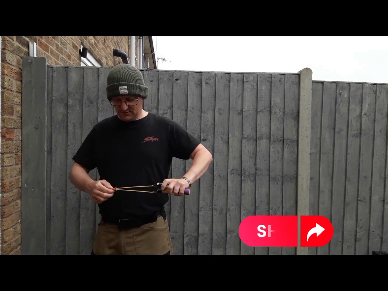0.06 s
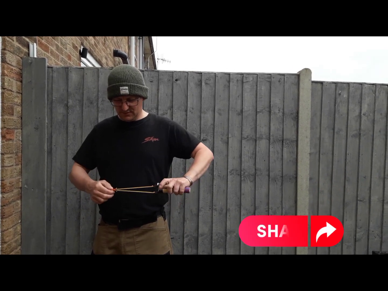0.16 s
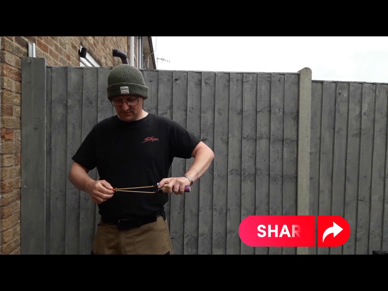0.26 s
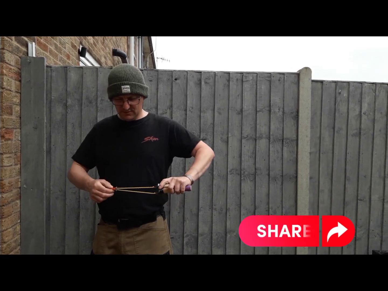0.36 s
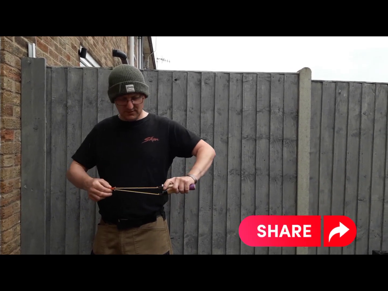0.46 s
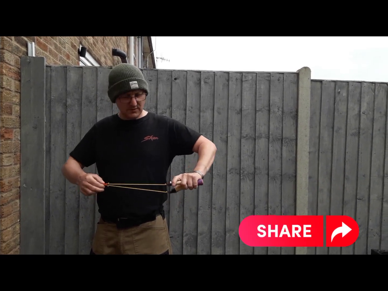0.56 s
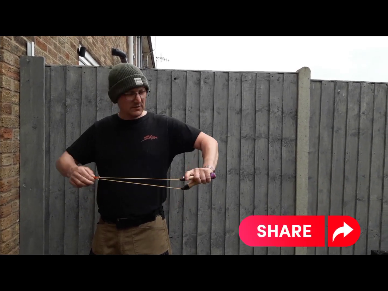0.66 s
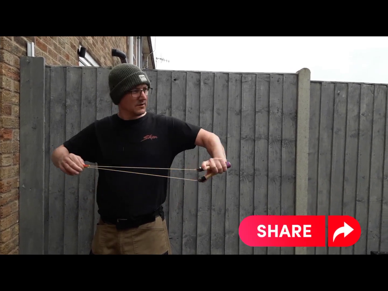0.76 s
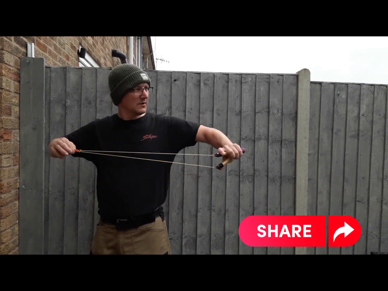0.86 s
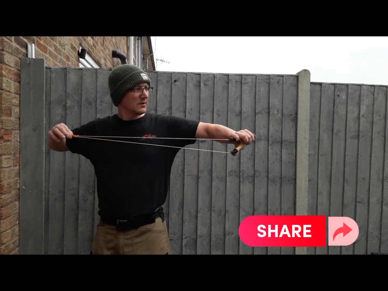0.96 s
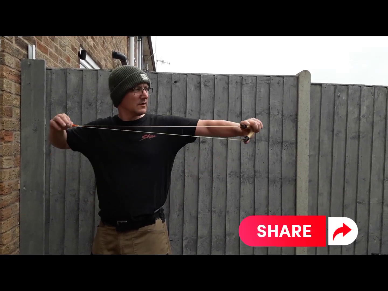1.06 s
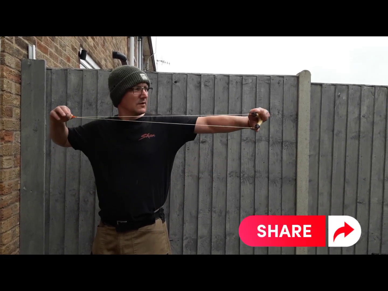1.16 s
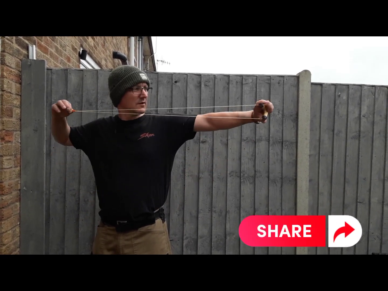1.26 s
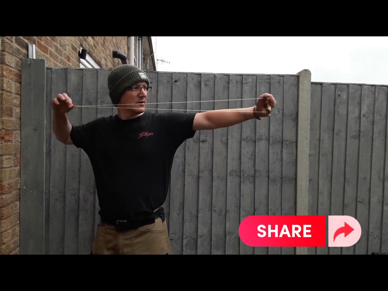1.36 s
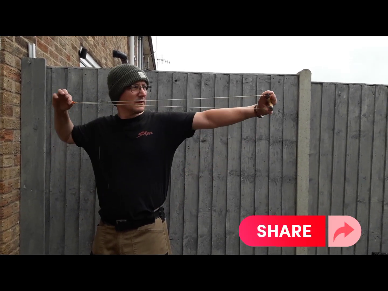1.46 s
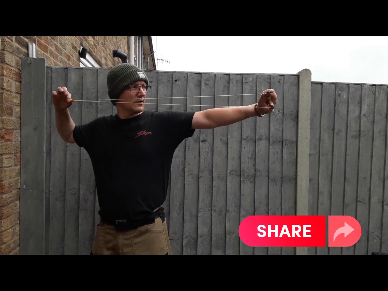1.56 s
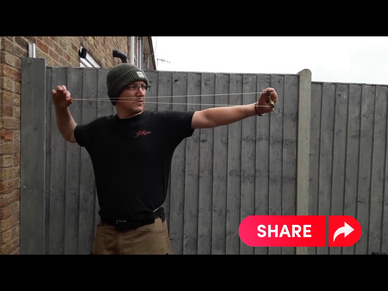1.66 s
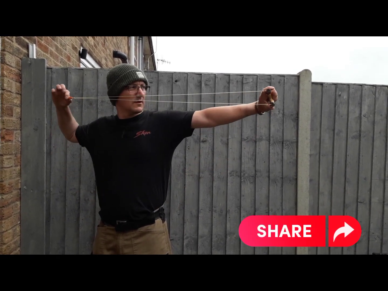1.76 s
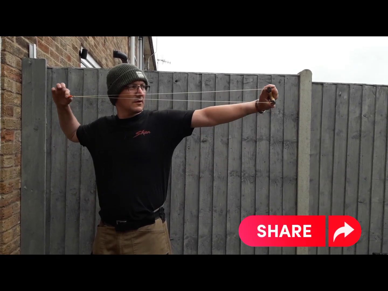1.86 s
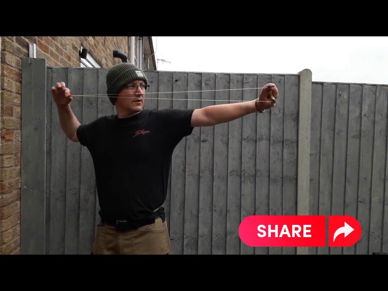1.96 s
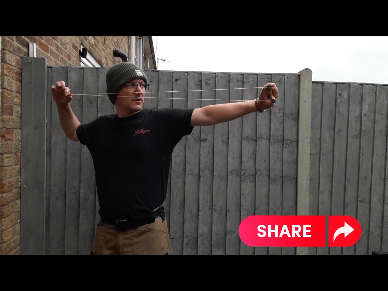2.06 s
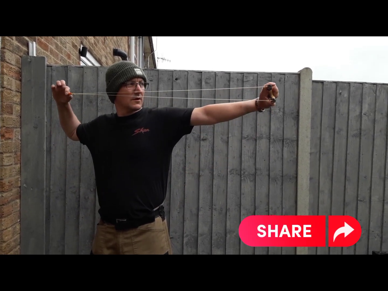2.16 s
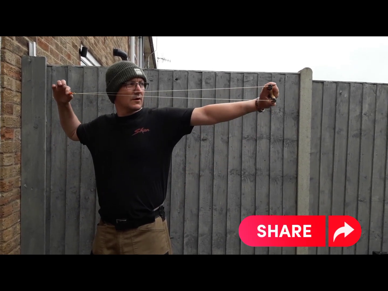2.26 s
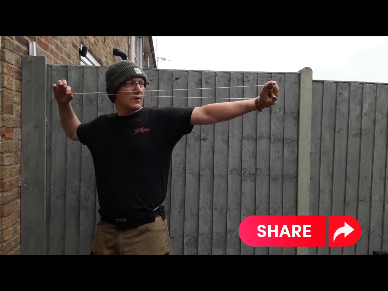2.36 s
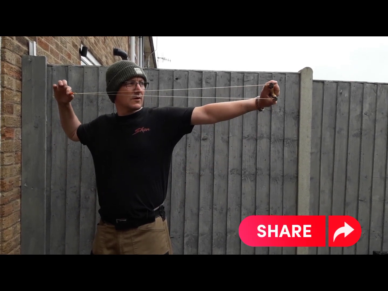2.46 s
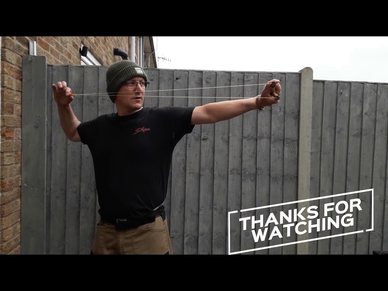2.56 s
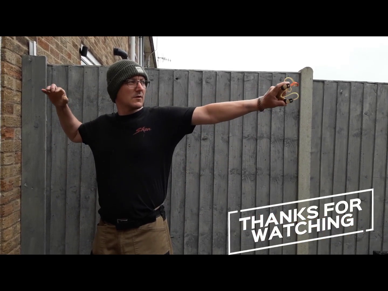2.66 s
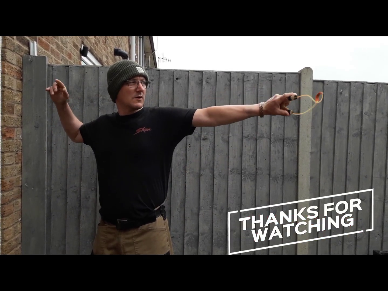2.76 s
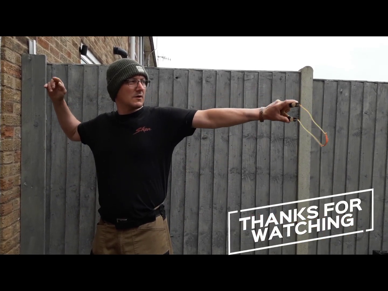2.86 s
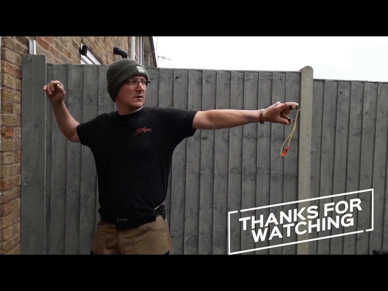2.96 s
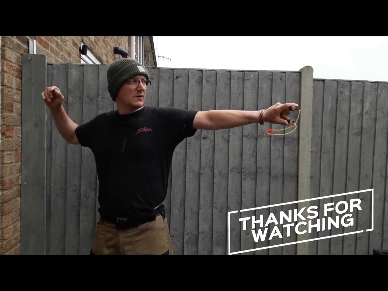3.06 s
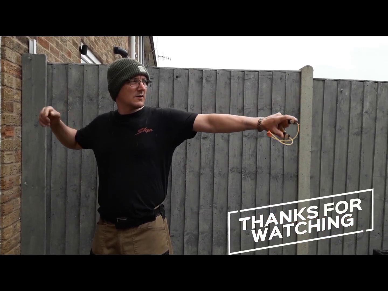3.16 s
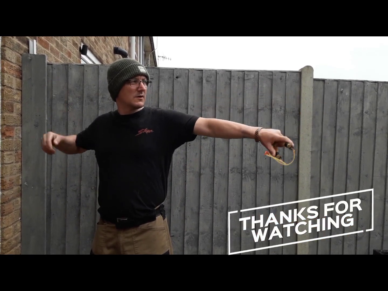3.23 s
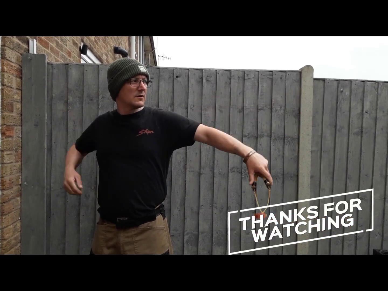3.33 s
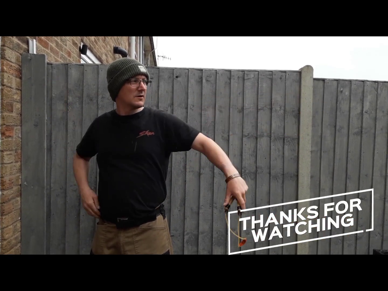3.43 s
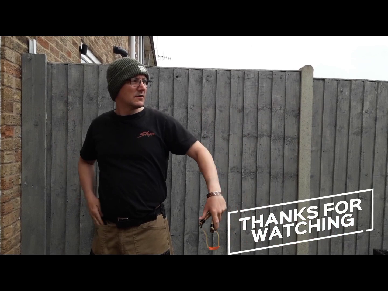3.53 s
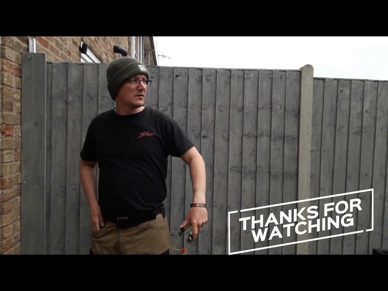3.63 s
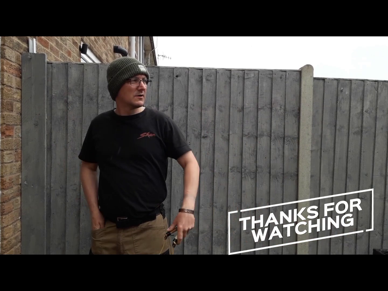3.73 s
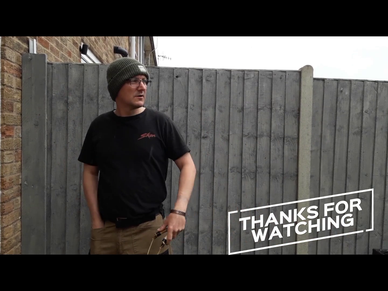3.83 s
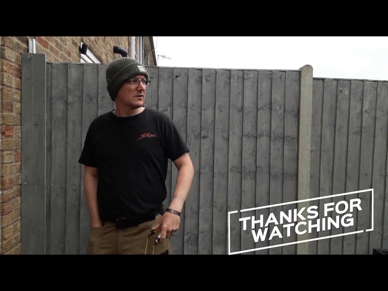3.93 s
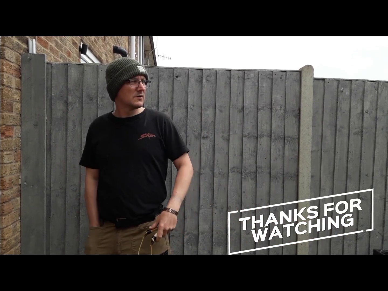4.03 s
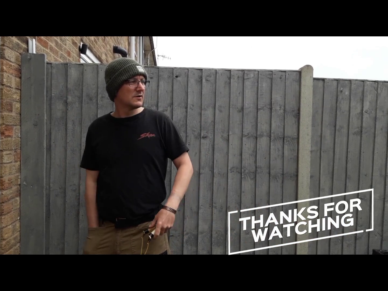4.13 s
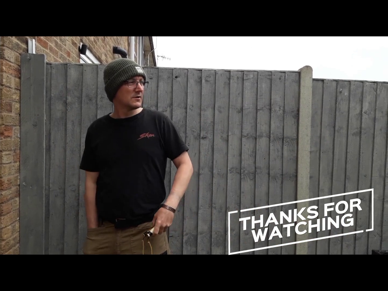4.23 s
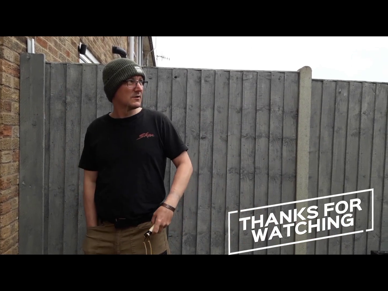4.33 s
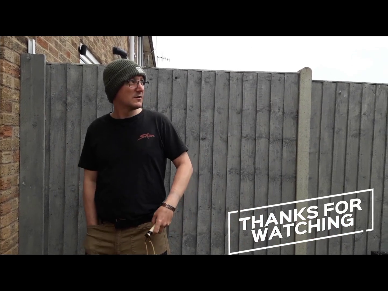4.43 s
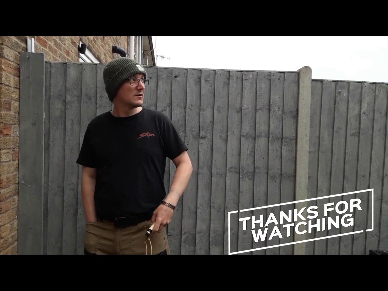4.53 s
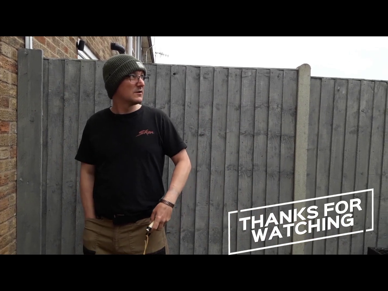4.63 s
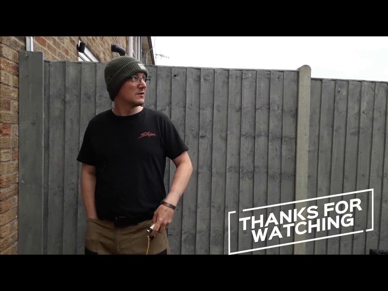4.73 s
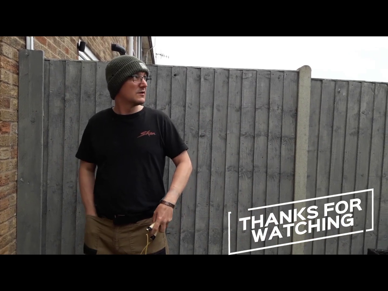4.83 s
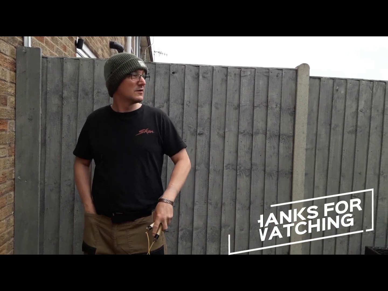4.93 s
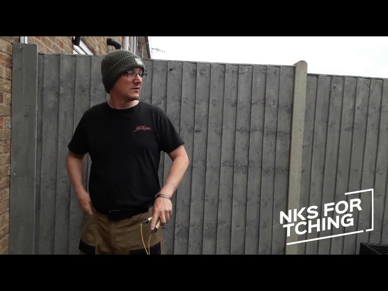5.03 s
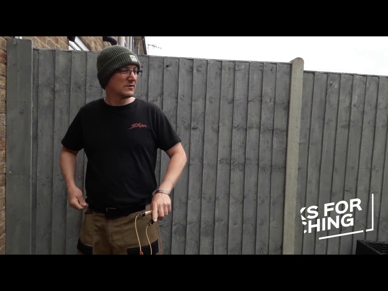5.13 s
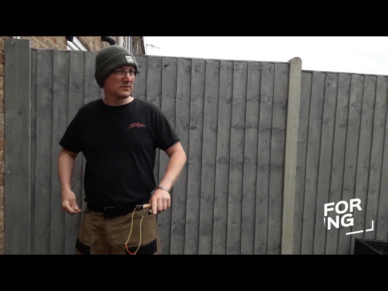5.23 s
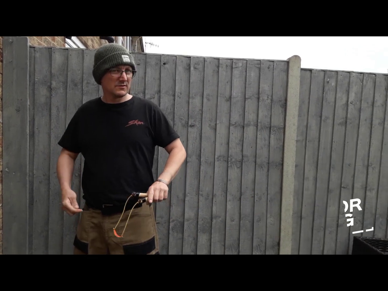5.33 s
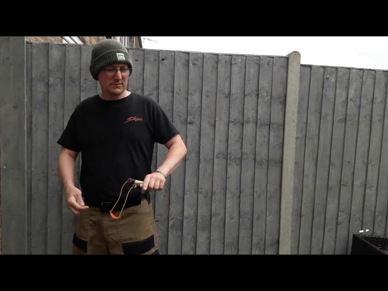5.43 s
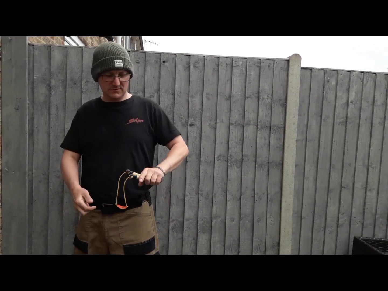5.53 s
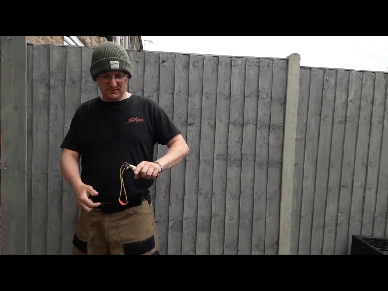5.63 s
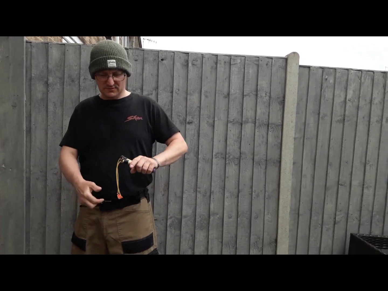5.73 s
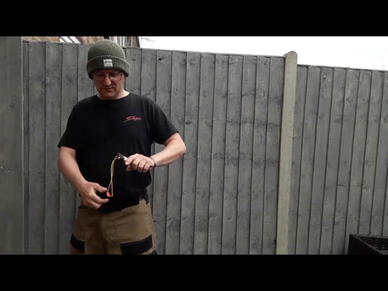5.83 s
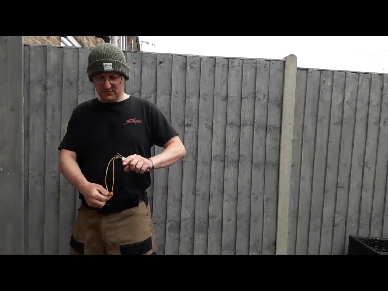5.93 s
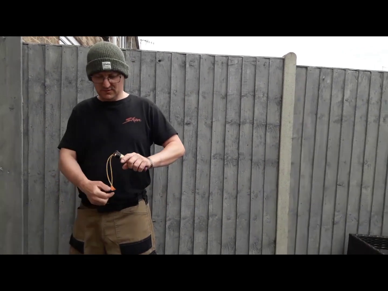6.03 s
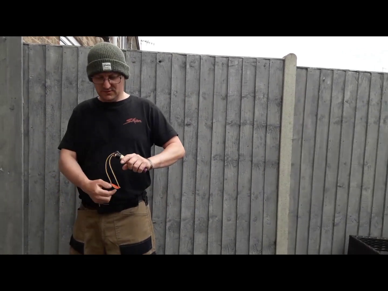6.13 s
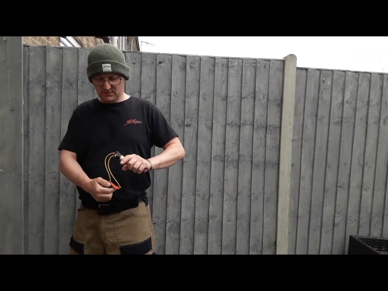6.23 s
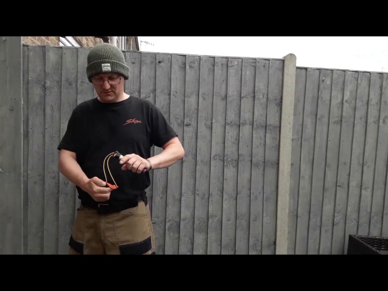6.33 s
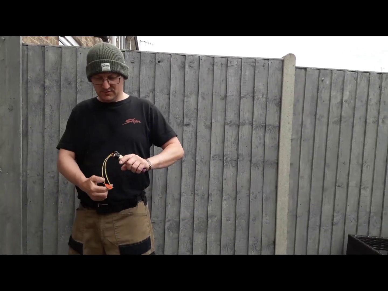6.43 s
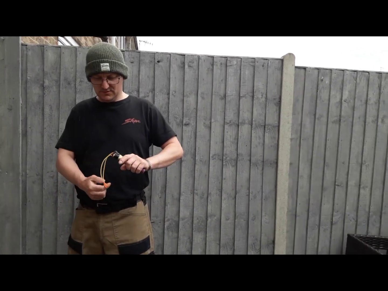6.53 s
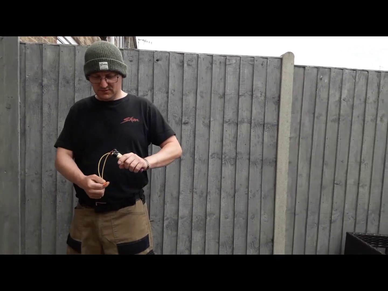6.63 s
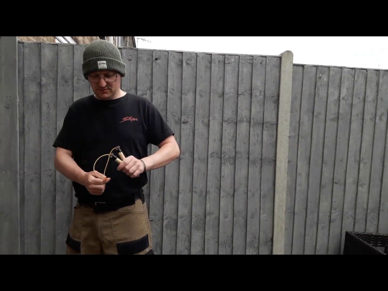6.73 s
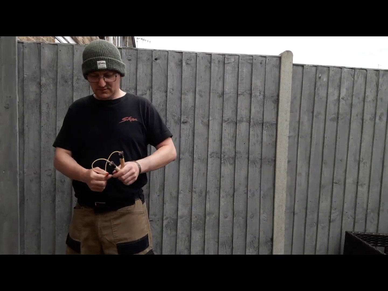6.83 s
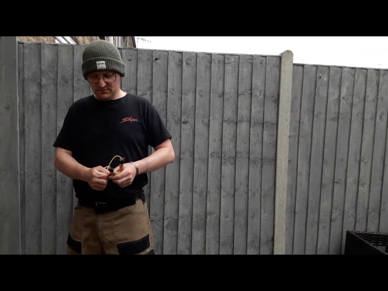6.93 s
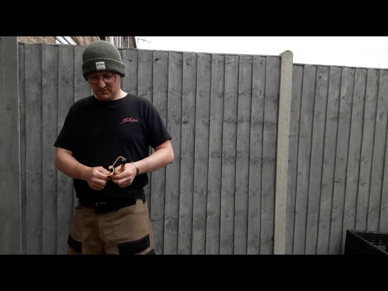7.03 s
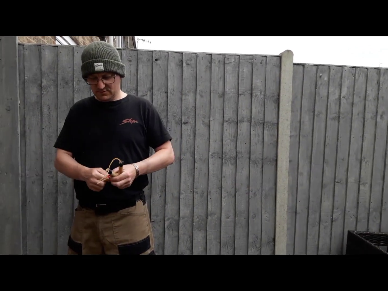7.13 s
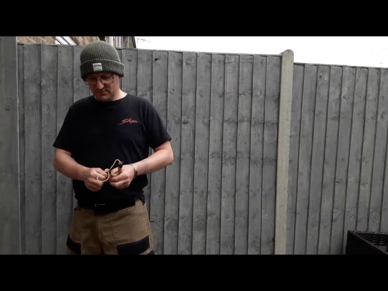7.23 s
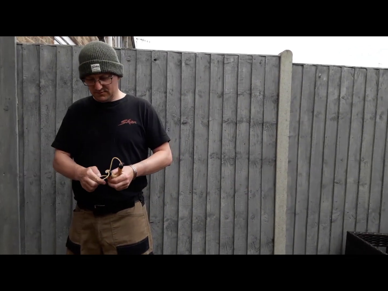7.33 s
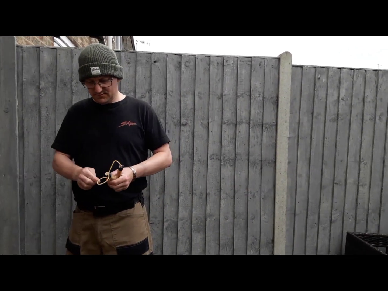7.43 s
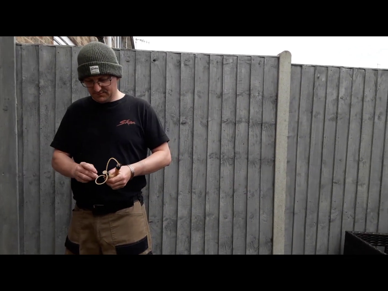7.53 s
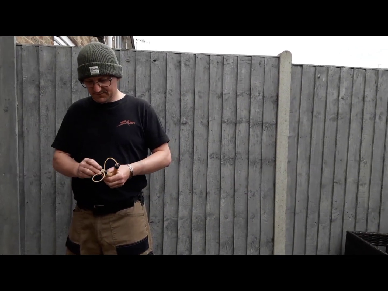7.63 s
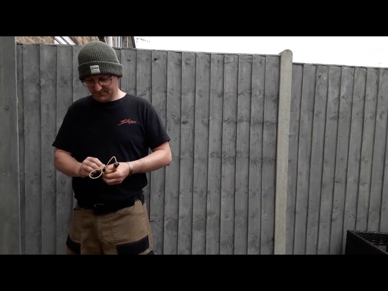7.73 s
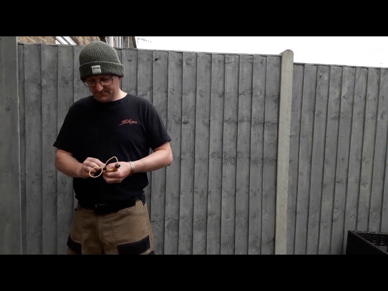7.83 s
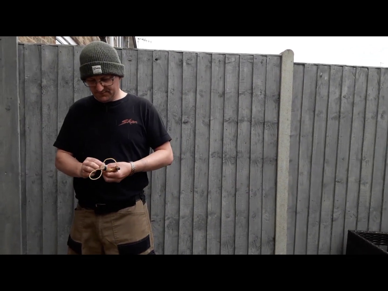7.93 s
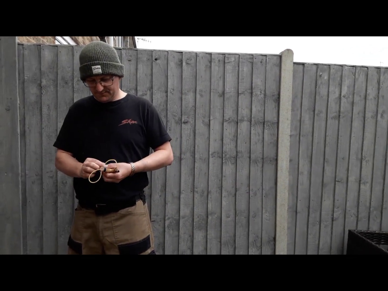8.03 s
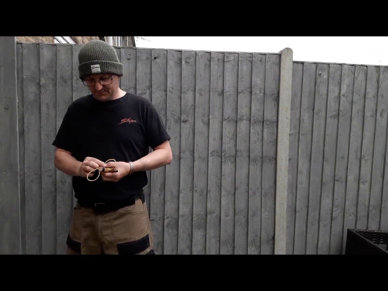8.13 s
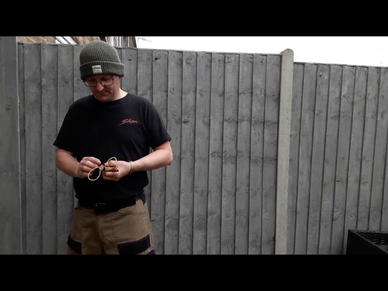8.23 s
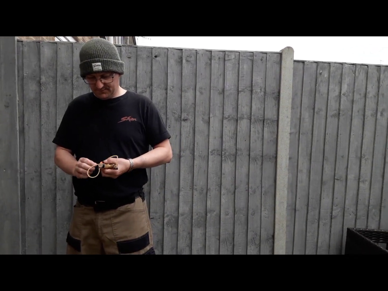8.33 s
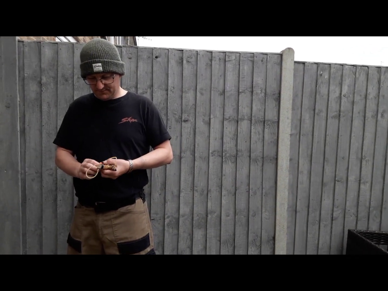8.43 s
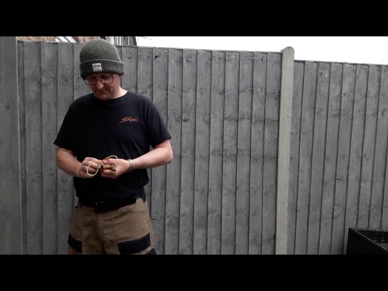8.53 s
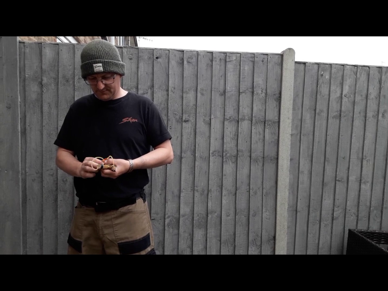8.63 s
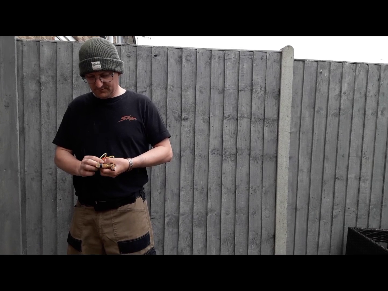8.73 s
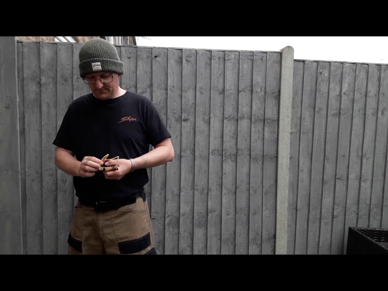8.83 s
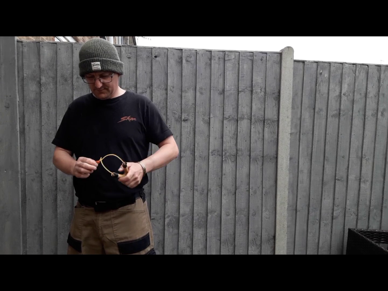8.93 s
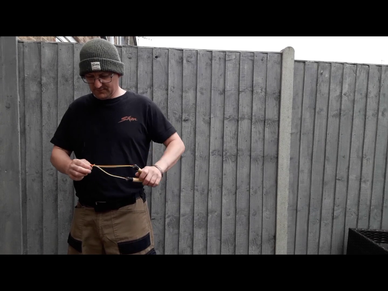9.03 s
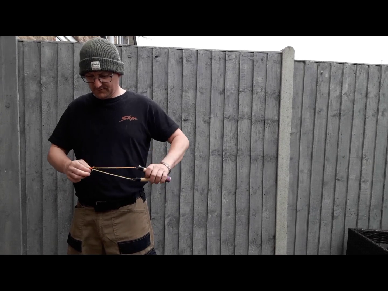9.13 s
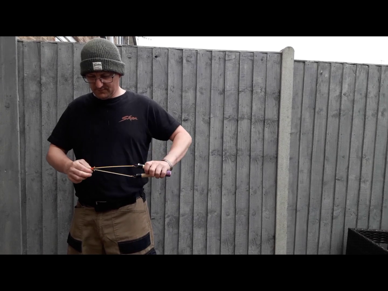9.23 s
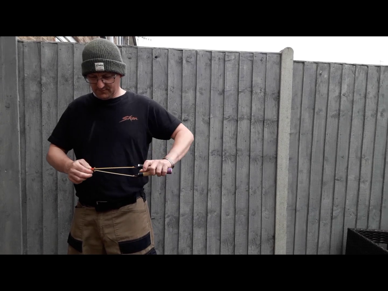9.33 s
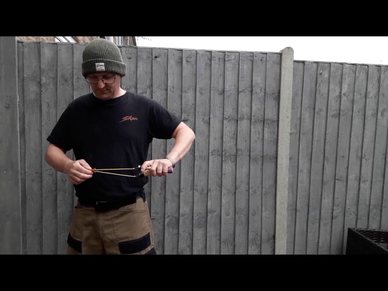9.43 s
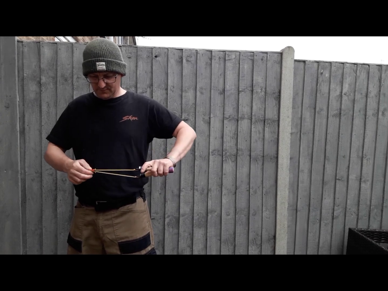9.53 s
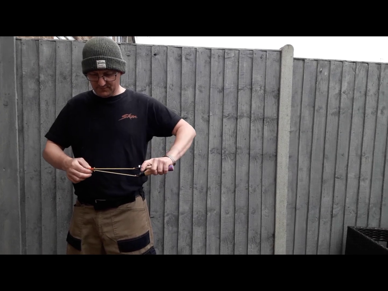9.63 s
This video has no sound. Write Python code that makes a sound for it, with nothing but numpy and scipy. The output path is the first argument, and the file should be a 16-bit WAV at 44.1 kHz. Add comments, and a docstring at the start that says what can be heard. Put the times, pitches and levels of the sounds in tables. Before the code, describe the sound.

Small creaks of stretched rubber lead to the sharp, close crack of a slingshot and the bright ring of a tin can that tumbles away. A soft cloth rustle and handling ticks follow, then a thin hinge squeak, latch clinks and a more distant wooden gate groan. The garden has a short echo, faint hiss, far town rumble and a few birds. Brief gusts thump the microphone last.

```python
"""A walled garden, one microphone: a faint hiss, the rumble of a far town and a few distant birds.
Close by, a slingshot's rubber creaks as it is drawn, then whips and slaps; the ball strikes a tin can,
which rings, tumbles and bounces. Cloth rustles close up, like a hand in a pocket. Later a dry hinge
squeaks, a latch clinks and, farther off, a wooden gate groans as it sticks and slips.
The walls give a short echo. At the end wind buffets the microphone."""
import sys
import numpy as np
from scipy import signal
from scipy.io import wavfile
from scipy.ndimage import uniform_filter1d, minimum_filter1d

SR = 44100
rng = np.random.default_rng(int(sys.argv[2]) if len(sys.argv) > 2 else 0)


def to_wav(sig):
    """Store sig (one row per channel, or 1-D mono) as 16-bit WAV at the path in sys.argv[1].

    Samples outside -1..1 are clipped; the rate is SR.
    """
    pcm = np.clip(np.atleast_2d(sig), -1, 1) * 32767
    pcm = np.round(pcm).astype(np.int16)
    wavfile.write(sys.argv[1], SR, pcm.T)  # frames by channels


N = 426888

# spectrum of the bands' slap and the can's rattle: (frequency [Hz], relative density [dB])
SLAP_SPECTRUM = [(35, -48.5), (60, -20.5), (389, -20.5), (621, -33), (924, -23), (1700, -24), (3270, -17.5),
                 (3940, -20), (6900, -4), (8320, -19), (16000, -48)]
# spectrum of the rustle at its loudest and of the latch's grit: (frequency [Hz], relative density [dB])
RUSTLE_SPECTRUM = [(500, -45.5), (900, -27), (3400, -22.5), (3900, -13), (5300, -5.5), (6000, -4.5),
                   (6750, 2.5), (7500, -8.5), (8100, -18.5), (10000, -38.5), (16000, -60.5)]


def amp(db):
    """Decibels as a gain."""
    return 10 ** (np.asarray(db) / 20)


def unit_rms(x):
    """Scales to rms 1."""
    return x / np.sqrt(np.mean(x ** 2) + 1e-20)


def unit_peak(x):
    """Scales to peak 1."""
    return x / abs(x).max()


def at_hz(points, hz):
    """Reads (frequency, value) points on a log frequency axis."""
    f, value = np.transpose(points)
    return np.interp(np.log(hz + 1), np.log(f + 1), value)


def envelope(rows):
    """A level curve as a gain, silent outside its span."""
    s, db = np.transpose(rows)
    return amp(np.interp(np.arange(N) / SR, s, db, left=-200, right=-200))


def surge(top_s, db, rise_db_per_s, fall_db_per_s):
    """A gain that climbs to its top and falls away at steady rates."""
    t = np.arange(N) / SR - top_s
    return amp(db + np.minimum(rise_db_per_s * t, -fall_db_per_s * t))


def add(mix, s, sound):
    """Mixes a sound in at s seconds."""
    part = mix[round(s * SR):][:len(sound)]
    part += sound[:len(part)]


def drift(count, size):
    """A random wander smoothed over size steps; rms 1."""
    return unit_rms(uniform_filter1d(rng.standard_normal(count), size=size))


def dying_noise(count, t60):
    """White noise that falls 60 dB in t60 seconds."""
    return rng.standard_normal(count) * amp(-60 * np.arange(count) / SR / t60)


def resonate(x, hz, *widths):
    """Resonances of gain 1 in series, one a width in Hz: shift hz to zero, smooth, shift back."""
    turn = np.exp(2j * np.pi * np.cumsum(hz * np.ones(len(x))) / SR)
    for width in widths:
        pole = np.exp(-np.pi * width / SR)
        x = 2 * (turn * signal.lfilter([1 - pole], [1, -pole], x / turn + 1e-18)).real
    return x


def noise(spectrum, patchy_db, flicker_db, size=512):
    """Coloured noise with drifting patches and a flicker shared by all frequencies; rms 1."""
    frames, hz = 4 * N // size + 5, np.fft.rfftfreq(size, 1 / SR)
    real, imag, patches = rng.standard_normal((frames, len(hz), 3)).T
    patches = unit_rms(uniform_filter1d(uniform_filter1d(patches, size=8, axis=0), size=12, axis=1))
    gain = amp(at_hz(spectrum, hz)[:, None] + patchy_db * patches + flicker_db * drift(frames, 3))
    return unit_rms(signal.istft((real + 1j * imag) * gain, nperseg=size, noverlap=size * 3 // 4)[1][:N])


def click(spectrum):
    """The causal pulse with this spectrum; peak 1."""
    log_gain = np.log(amp(at_hz(spectrum, abs(np.fft.fftfreq(4096, 1 / SR)))))
    return unit_peak(np.fft.ifft(np.exp(np.conj(signal.hilbert(log_gain)))).real[:2048])


def ring(modes, dull_db, rough_hz, steady, rise_s):
    """Dented metal: modes wobble in size and phase as they die; a dull blow weakens the high ones."""
    hz, db, t60 = np.transpose(modes)[:, :, None]
    t, hop = np.arange(16384) / SR, 64
    real, imag = rng.standard_normal((2, len(modes), len(t) // hop + 2))
    poles = np.exp(-np.pi * rough_hz * hz[:, 0] / 3000 * hop / SR)  # high modes wobble faster
    slow = np.array([signal.lfilter([1], np.poly([p, p]), w) for p, w in zip(poles, real + 1j * imag)])
    slow = steady + slow / np.sqrt(np.mean(abs(slow) ** 2, axis=1, keepdims=True))
    step, part = np.divmod(np.arange(len(t)), hop)
    wobble = slow[:, step] + (slow[:, step + 1] - slow[:, step]) * part / hop
    turn = np.exp(2j * np.pi * (hz * t + rng.random(hz.shape)))
    decay = amp(db - dull_db * np.log2(hz / 6500) - 60 * t / t60)
    return unit_peak((decay * (wobble * turn).real).sum(0)) * (1 - np.exp(-(t / rise_s) ** 2))


def rustle():
    """A faint hiss swells into a close cloth rustle, like a hand in a pocket, with dry fizz and scrape."""
    # hiss and rustle at the microphone: (time [s], level [dB])
    levels = [(0.0, -63), (1.54, -62), (1.8, -59), (2.55, -63), (3.45, -61), (4.05, -53), (4.38, -55.5),
              (4.77, -45.5), (4.9, -47.5), (5.03, -44), (5.12, -49), (5.4, -53.5), (5.5, -61.5),
              (5.75, -62), (6.03, -56), (6.44, -60), (6.8, -49), (7.0, -56.5), (7.15, -50.5), (7.33, -55),
              (7.56, -52), (8.0, -50), (8.39, -56.5), (9.68, -52.5)]
    # spectra of faint hiss, fizz and scrape: (frequency [Hz], relative density [dB])
    thin = [(1200, -47.5), (2000, -14), (3500, -15), (5000, -20.5), (5900, -9.5), (6400, 0), (7100, 3),
            (7700, -10), (8300, -31), (12000, -56.5), (16000, -64)]
    fizzy = [(7000, -41), (9000, 7.5), (11500, -12), (13000, -18), (16000, -6)]
    rough = [(500, -18.5), (1000, 4), (1400, -5), (1900, 3.5), (2500, -4), (3800, -5), (5000, -26)]
    level, loud_db = envelope(levels), -45.5
    db = 20 * np.log10(level + 1e-9)
    broad = np.clip((db + 63.5) / 14, 0, 1)
    fizz = amp(-67 + 3 * (db - loud_db)) * noise(fizzy, 1.4, 1.7)
    scrape = amp(-63 + 2 * (db - loud_db)) * noise(rough, 1.9, 2.6, size=256)
    hiss = np.sqrt(1 - broad) * noise(thin, 1.7, 1.4)
    cloth = np.sqrt(broad) * noise(RUSTLE_SPECTRUM, 1.0, 0.95)
    return fizz + scrape + level * (hiss + cloth)


def town():
    """The far town: a low rumble that slowly rises and falls."""
    # rumble at the microphone: (time [s], level [dB])
    levels = [(0.0, -60.5), (1.89, -60.5), (2.1, -57), (2.55, -61.5), (3.71, -65), (4.1, -59),
              (4.66, -63.5), (4.99, -59), (5.45, -64.5), (6.03, -59.5), (7.6, -60.5), (8.01, -55.5),
              (8.7, -63), (9.68, -61.5)]
    # its spectrum: (frequency [Hz], relative density [dB])
    rumble = [(15, -50.5), (25, -11), (113, -1.5), (144, 0), (280, -1), (582, -14), (830, -11.5),
              (1930, -19.5), (2570, -29), (4280, -66), (5000, -39), (6500, -52), (11000, -120)]
    return envelope(levels) * noise(rumble, patchy_db=2.3, flicker_db=0.4, size=2048)


def swells():
    """Soft swells and thuds in the background: short rounded lumps of noise."""
    # noise lumps: (time [s], length [s], centre [Hz], width [Hz], level [dB])
    lumps = [(0.119, 0.12, 6760, 670, -54.5), (0.72, 0.18, 273, 248, -56), (1.193, 0.2, 362, 304, -56.5),
             (1.211, 0.19, 790, 388, -59.5), (2.096, 0.21, 1000, 590, -63), (3.235, 0.077, 197, 121, -48),
             (6.576, 0.23, 284, 100, -59), (6.903, 0.17, 260, 100, -56), (6.014, 0.067, 1980, 500, -62),
             (7.513, 0.06, 780, 150, -52.5), (7.934, 0.079, 380, 152, -56),
             (9.062, 0.084, 1506, 910, -62.5)]
    out = np.zeros(N)
    for s, length, hz, width, db in lumps:
        count = int(length * SR)
        lump = resonate(rng.standard_normal(count), hz, width, width)
        add(out, s, amp(db) * unit_rms(lump) * signal.windows.tukey(count, .6))
    return out


def birds():
    """Distant calls, heard as short fuzzy glides."""
    # bird calls: (time [s], length [s], from [Hz], to [Hz], blur [Hz], level [dB])
    calls = [(0.138, 0.11, 5400, 5100, 700, -67), (0.506, .1, 4050, 3200, 600, -66.5),
             (0.925, 0.13, 4250, 4400, 450, -67), (3.471, 0.28, 3830, 4270, 604, -63),
             (3.625, 0.074, 3895, 3620, 401, -69), (4.123, 0.19, 4400, 4650, 298, -68),
             (4.385, 0.098, 3800, 4070, 298, -62.5), (4.587, 0.082, 3900, 4000, 300, -67),
             (4.659, .13, 4850, 4000, 80, -57)]
    out = np.zeros(N)
    for s, length, from_hz, to_hz, blur, db in calls:
        count = int(length * SR)
        call = resonate(rng.standard_normal(count), np.linspace(from_hz, to_hz, count), blur, blur)
        add(out, s, amp(db) * unit_rms(call) * np.hanning(count))
    return out


def ticks():
    """Stretched rubber creaks and hands tick close by: each slip is a bright snap over a duller body."""
    # creaks and handling ticks: (time [s], snap peak [dB], body against snap [dB])
    creaks = [(0.9237, -43, -5), (1.1341, -34.5, -9), (1.2066, -36, -9.5), (1.479, -29.5, -3),
              (1.558, -38, -8), (1.629, -36.5, -6), (1.8576, -38.5, -7.5), (1.8988, -38.5, -9),
              (1.929, -37.5, -7), (2.0598, -33.5, -10), (2.0648, -28, -10), (2.0733, -41, -1),
              (2.1118, -33.5, -7.5), (2.152, -30, -5), (2.3127, -35, -12), (3.3804, -42.5, -1),
              (3.5748, -31.5, -30), (4.228, -37, -15), (4.423, -53, -2), (5.282, -37, -30),
              (5.3886, -32, -14), (5.7972, -27.5, -11), (5.868, -28, -30), (5.9726, -41.5, -26),
              (6.3263, -40.5, -5), (6.6497, -40.5, -20), (6.8064, -44, -8), (7.9305, -38.5, 2),
              (8.0674, -30, -22), (9.4376, -35.5, -27)]
    snap = click([(1000, -21), (3500, -13.5), (5500, -7), (6800, 7.5), (8100, -16), (10500, -41),
                  (16000, -69)])
    body = click([(300, -25), (900, -2), (1500, 3), (2300, 8), (3200, -14.5), (5000, -20), (16000, -37)])
    out, faint_per_s = np.zeros(N), 1.5
    draws = rng.random((round(faint_per_s * N / SR), 2))
    faint = [(when * (N / SR - .1), -48 + 4 * force, -20) for when, force in draws]
    for s, db, body_db in creaks + faint:
        slip = rng.standard_normal(40) * np.hanning(40)  # about a millisecond
        bright = unit_peak(np.convolve(slip, snap))
        dull = unit_peak(np.convolve(abs(slip), body))
        add(out, s, amp(db) * (bright + amp(body_db) * dull))
    return out


def slingshot():
    """The release, close up: a flurry of slaps over the fluttering whip of the bands through the air."""
    # slaps of band and pouch: (time [s], peak [dB])
    slaps = [(2.635, -7), (2.6445, 2.5), (2.6458, 3.5), (2.6497, 6), (2.6528, 1.5), (2.6546, -2),
             (2.661, 2.5), (2.662, 0.5), (2.6719, 6.5), (2.68, 3), (2.689, 1), (2.701, -11.5)]
    top_s, stop_s = 2.65, 0.098
    late = np.maximum(np.arange(N) / SR - top_s, 0) / stop_s
    cutoff = np.exp(-np.minimum(late, 5) ** 3)  # closes ever faster
    whip = surge(top_s, db=-6, rise_db_per_s=1698.5, fall_db_per_s=141.5) * cutoff
    out = whip * noise(SLAP_SPECTRUM, 1.8, 1.8, size=256)
    pulse = click(SLAP_SPECTRUM)
    rise = np.arange(200) / SR / 0.00047  # each burst swells for a moment, then dies
    for s, db in slaps:
        burst = np.convolve(rng.standard_normal(200) * rise * np.exp(-rise), pulse)
        add(out, s, amp(db) * unit_peak(burst))
    return out


def can():
    """The ball hits, then the can bounces: each blow knocks, rattles and sets the tin ringing."""
    # blows: (time [s], ring level [dB], dullness [dB/octave], rattle and knock against the ring [dB])
    blows = [(2.766, 12, 0, -12.5, -10.5), (2.942, -24.5, -3, -13, -29), (3.075, -16, 8.5, -14, -1),
             (3.089, -43, -12, -6, -16), (3.153, -30.5, 22, -15, 1.5), (3.244, -37, 0.5, -17, -2),
             (3.295, -34.5, 17, -16, -0.5)]
    # modes of the tin: (frequency [Hz], relative level [dB], t60 [s])
    modes = [(766, -40.5, 0.06), (1172, -26, 0.25), (1750, -23, 0.27), (2056, -26.5, 0.38),
             (2800, -28.5, .2), (2900, -11.5, 0.2), (2924, -17.5, 0.084), (3600, -21, 0.076),
             (3810, -24.5, 0.22), (3880, -16, 0.23), (4770, -28, 0.14), (5340, -17, 0.31),
             (5540, -23, 0.074), (6100, -23.5, .19), (6100, -19.5, 0.13), (6550, -14, 0.082),
             (6573, -4, 0.11), (6670, -4, .25), (6850, -5.5, .22), (7300, -10, 0.044), (7020, -15, 0.16),
             (8120, -21, 0.27), (8200, -26, 0.23), (8730, -18, 0.2), (9200, -31, .15), (10100, -26.5, 0.18)]
    out, pulse, t = np.zeros(N), click(SLAP_SPECTRUM), np.arange(SR // 4) / SR
    for s, db, dull_db, rattle_db, knock_db in blows:
        rattle = unit_rms(np.convolve(rng.standard_normal(len(t)), pulse)[:len(t)])
        contact = click([(40, -36.5), (150, -17.5 - 1.4 * dull_db), (450, -14.5 - dull_db), (750, -7),
                         (2000, -3.5), (3500, -10 - 3 * dull_db), (16000, -34 - 2.7 * dull_db)])
        knock = np.convolve(rng.standard_normal(1500) * np.exp(-t[:1500] / 0.0042), contact)
        add(out, s, amp(db) * ring(modes, dull_db, rough_hz=80, steady=0.3, rise_s=.0002))
        add(out, s, amp(db + rattle_db - 60 * t / 0.18) * rattle)
        add(out, s, amp(db + knock_db) * unit_peak(knock))
    return out


def hinge():
    """Dry metal slips so fast that it whistles, warbling at first and wavering throughout."""
    # one list a squeak: (time [s], pitch [Hz], level [dB])
    squeaks = [
        [(6.6, 6030, -44), (6.618, 6400, -32), (6.645, 6830, -42), (6.675, 7230, -43), (6.7, 8300, -79)],
        [(6.71, 10400, -75), (6.78, 9600, -65), (6.835, 9300, -58), (6.856, 8700, -73)],
        [(6.91, 6130, -52), (6.918, 6120, -38), (6.94, 6150, -43.5), (6.96, 5950, -48), (7.0, 5880, -45.5),
         (7.1, 5700, -49), (7.17, 5000, -54), (7.26, 4560, -62)],
    ]
    warble_per_s, warble_hz, fade_s, waver_hz = 42, 150, 0.067, 37
    out = np.zeros(N)
    for rows in squeaks:
        s, hz, db = np.transpose(rows)
        t = np.arange(s[0], s[-1], 1 / SR)
        warble = warble_hz * np.cos(2 * np.pi * warble_per_s * (t - s[1])) * np.exp(-(t - s[0]) / fade_s)
        pitch = np.interp(t, s, hz) + warble + waver_hz * drift(len(t), 300)
        level = amp(np.interp(t, s, db) + 0.49 * drift(len(t), 300))
        tone = np.sqrt(2) * np.sin(2 * np.pi * np.cumsum(pitch) / SR)
        add(out, s[0], level * tone * signal.windows.tukey(len(t), .1))
    return out


def latch():
    """Metal strikes metal: a short ring with a gritty edge."""
    # clinks: (time [s], ring level [dB], dullness [dB/octave])
    clinks = [(7.065, -32.5, 6), (7.0753, -17, -1.3), (7.091, -24, 9), (7.224, -23.5, 2.5)]
    # modes of the latch: (frequency [Hz], relative level [dB], t60 [s])
    modes = [(2460, -30.5, 0.51), (2786, -26.5, 0.1), (4313, -25, 0.09), (5920, -25, 0.39),
             (6240, -18.5, 0.14), (6610, 4, 0.019), (6940, -12, 0.083)]
    out = np.zeros(N)
    for s, db, dull_db in clinks:
        grit = np.convolve(dying_noise(4000, t60=0.22), click(RUSTLE_SPECTRUM))
        add(out, s, amp(db) * ring(modes, dull_db, rough_hz=63, steady=0.49, rise_s=0.00059))
        add(out, s, amp(db - 12) * unit_peak(grit))
    return out


def gate():
    """A double knock, then stick-slip pulses, partly blurred into puffs of noise, ring the wooden gate."""
    # groan of the gate: (time [s], level [dB])
    groan = [(7.49, -54), (7.539, -42), (7.601, -37.5), (7.749, -40.5), (7.969, -45.5), (8.01, -56.5),
             (8.12, -59.5)]
    # resonances of the wood: (frequency [Hz], width [Hz], relative level [dB])
    modes = [(736, 120, -23), (1420, 320, 1), (1670, 296, 3.5), (2094, 130, 2), (2940, 91, -16),
             (3470, 430, -6.5), (5100, 330, -9.5), (5940, 400, -7)]
    # knocks on the gate: (time [s], peak [dB])
    knocks = [(7.408, -49), (7.414, -40.5)]
    s, db = np.transpose(groan)
    t = np.arange(s[0], s[-1], 1 / SR)
    age = t - s[0]
    slips_per_s = 192 * (1 - .14 * np.exp(-age / .05) - .14 * age)  # speeds up, then slackens
    turns = np.cumsum(slips_per_s * (1 + 0.012 * drift(len(t), 1500))) / SR
    accent = amp(5.2 * np.cos(2 * np.pi * turns / 3))  # every third slip is stronger
    slips = np.diff(np.floor(turns), prepend=0) * accent
    puffs = (0.32 + np.exp(-(turns % 1) / 0.76)) * rng.standard_normal(len(t))
    rough = np.interp(t, [s[0], (s[0] + s[-1]) / 2, s[-1]], [.5, .28, .7])
    drive = (1 - rough) * unit_rms(slips) + rough * unit_rms(puffs)
    wood = sum(amp(mode_db) / np.sqrt(width) * resonate(drive, hz, width, 2 * width, 4 * width)
               for hz, width, mode_db in modes)
    out = np.zeros(N)
    add(out, s[0], amp(np.interp(t, s, db)) * unit_rms(wood) * signal.windows.tukey(len(t), .05))
    for at, peak_db in knocks:
        knock = resonate(resonate(dying_noise(2000, t60=0.031), 1420, 500), 1430, 500)
        add(out, at, amp(peak_db) * unit_peak(knock))
    return out


def wind():
    """Eddies buffet the microphone at a shifting rate; a few land as single pops."""
    # gusts: (time of top [s], level [dB], centre of the buffeting [Hz])
    gusts = [(8.616, -50, 100), (8.82, -56, 103), (9.079, -41.5, 126), (9.166, -46.5, 109),
             (9.261, -29, 147), (9.37, -45.5, 110), (9.47, -42.5, 118), (9.524, -35.5, 172),
             (9.636, -33.5, 100)]
    # spectrum of the buffeting: (frequency [Hz], relative density [dB])
    buffet = [(12, -46.5), (20, -29), (59, -3.5), (156, -10), (452, -20), (501, -28.5), (756, -47),
              (1200, -52), (1560, -72), (2640, -120)]
    # pressure pops: (time [s], level [dB], frequency [Hz])
    pops = [(9.074, -36.5, 152), (9.309, -19, 194), (9.444, -30, 129), (9.515, -33, 322),
            (9.635, -38.5, 100)]
    s, db, hz = np.transpose(gusts)
    centre = np.interp(np.arange(N) / SR, s, hz)
    level = sum(surge(at, top_db, rise_db_per_s=352, fall_db_per_s=280) for at, top_db in zip(s, db))
    eddies = resonate(noise(buffet, 0.88, 1.37, size=1024), centre, 110)
    eddies = unit_rms(eddies / amp(at_hz(buffet, centre)))  # equally strong wherever the centre lies
    out = level * unit_rms(eddies + 0.68 * noise(buffet, 3.7, 2.5, size=1024))
    for at, pop_db, pop_hz in pops:
        turns = np.linspace(0, 1.6, int(1.6 * SR / pop_hz))
        add(out, at, -amp(pop_db) * np.sin(2 * np.pi * turns) * np.hanning(len(turns)) ** 0.86)
    return out


def garden_echo(x):
    """Sparse echoes of random sign from walls and fences, each band dying at its own speed."""
    # decay of the garden: (frequency [Hz], t60 [s])
    decay = [(100, .2), (1000, 0.33), (4000, 0.24), (8000, 0.24), (16000, 0.067)]
    taps = np.zeros(SR // 2)
    at = np.arange(200, SR // 2 - 20, 20)
    taps[at + rng.integers(0, 20, len(at))] = rng.choice([-1., 1.], len(at))
    hz, t, bands = signal.stft(taps, SR, nperseg=256)
    tail = signal.istft(bands * amp(-60 * t / at_hz(decay, hz)[:, None]), SR, nperseg=256)[1]
    return signal.oaconvolve(x, tail / np.linalg.norm(tail))[:N]


def scene():
    """The garden at the microphone, in mono; gate and birds carry more echo than the near sounds."""
    near = slingshot() + can() + ticks()
    far = gate() + birds()
    background = town() + swells()
    metal = hinge() + latch()
    echo = garden_echo(amp(-12) * near + amp(-5) * far + amp(-16.5) * metal)
    return (near + far + metal + echo + rustle() + background + wind())[None]


def record(dry):
    """The recorder: self-noise, gain control that ducks at the shot, soft overload, band limits."""
    self_noise_db, threshold_db, hold_s, release_s, ceiling = -79, -24.5, 1.02, .08, .78
    x = dry[0] + amp(self_noise_db) * rng.standard_normal(N)
    power_db = 10 * np.log10(abs(uniform_filter1d(x ** 2, size=400, origin=199)) + 1e-12)
    over_db = np.clip(power_db - threshold_db, 0, 12)
    hold = int(hold_s * SR) // 2 * 2 + 1
    held_db = -minimum_filter1d(-over_db, hold, origin=hold // 2, mode="nearest")
    pole = np.exp(-1 / (SR * release_s))
    released_db = np.maximum(held_db, signal.lfilter([1 - pole], [1, -pole], held_db))
    ducked = x / amp(0.56 * released_db)
    saturated = ceiling * np.tanh(ducked / ceiling)
    low_cut = signal.butter(4, 34, "high", fs=SR, output="sos")
    high_cut = signal.firwin(511, 15700, window=("kaiser", 9), fs=SR)
    return signal.oaconvolve(signal.sosfilt(low_cut, saturated), high_cut, "same")[None]


dry = scene()
out = record(dry)
to_wav(out)
```